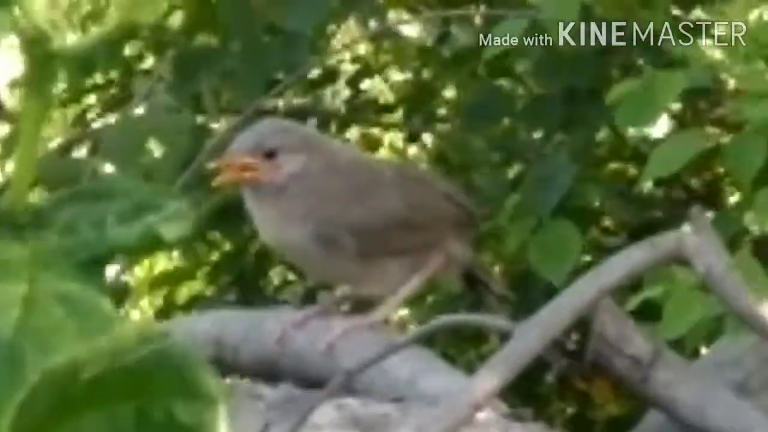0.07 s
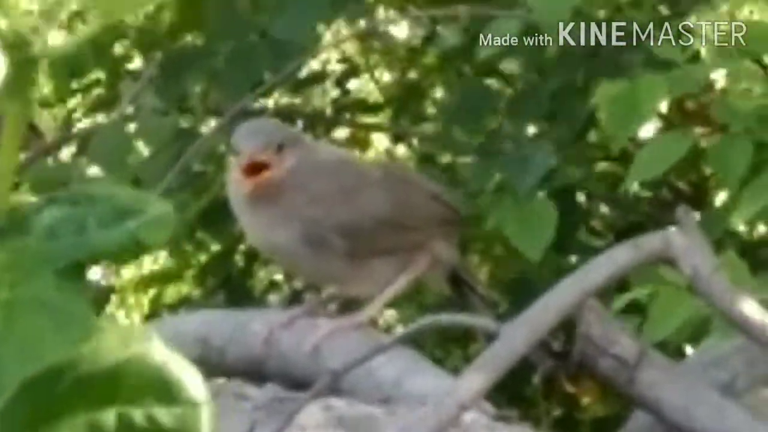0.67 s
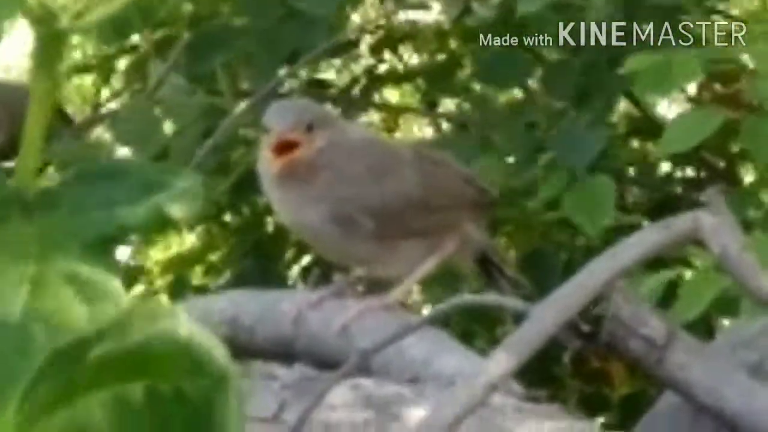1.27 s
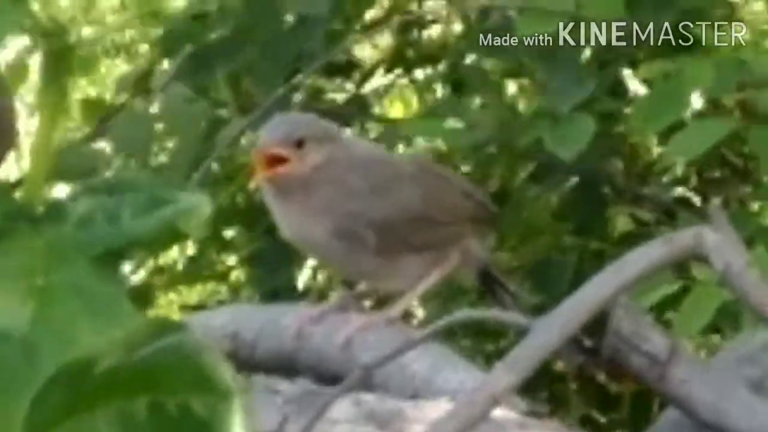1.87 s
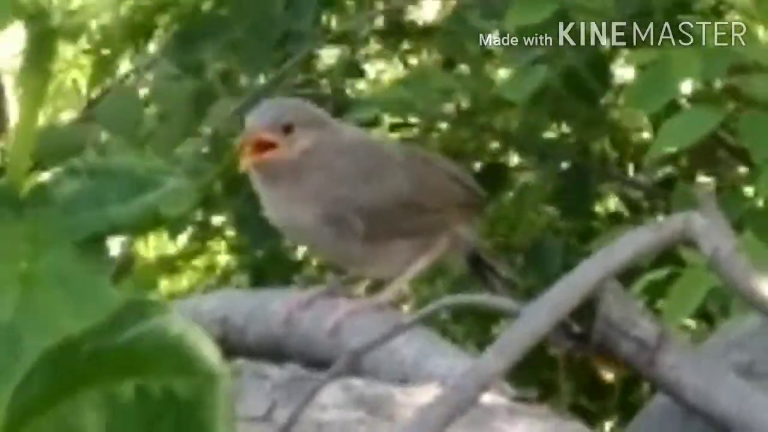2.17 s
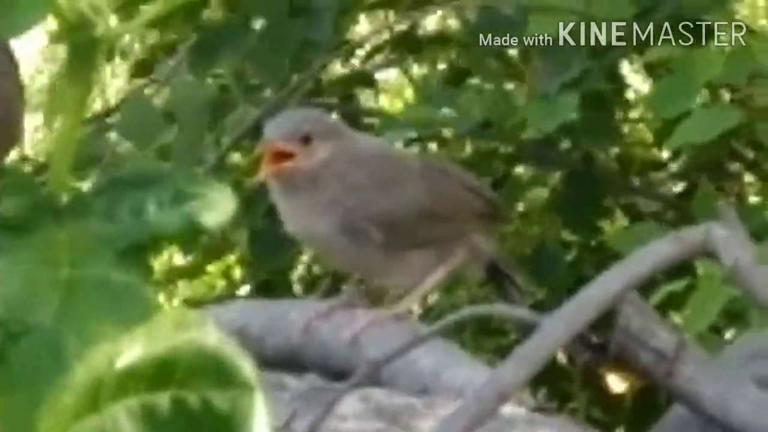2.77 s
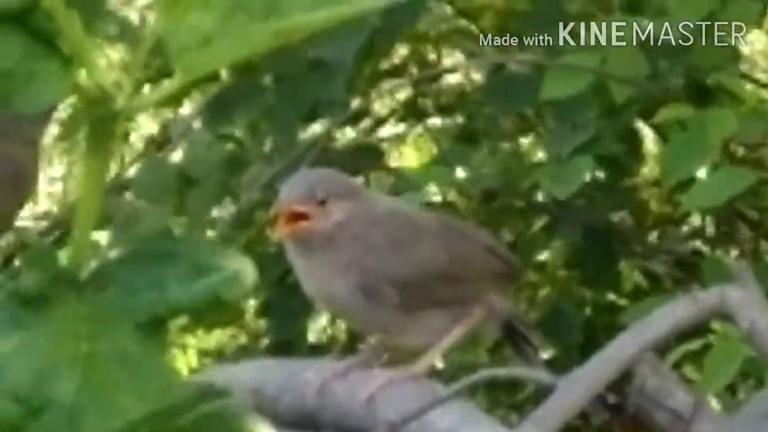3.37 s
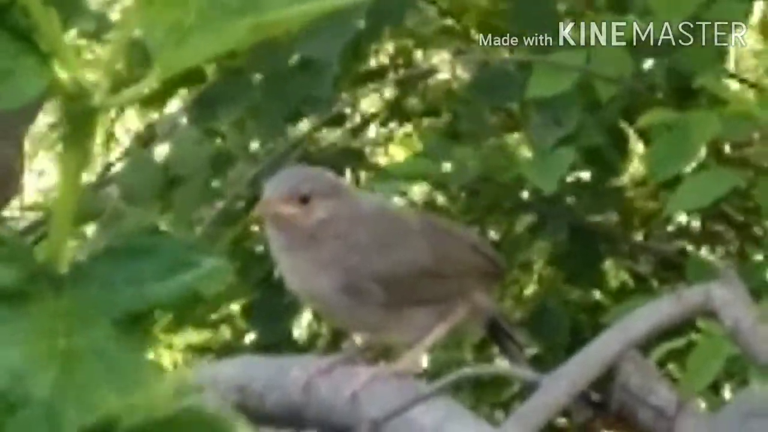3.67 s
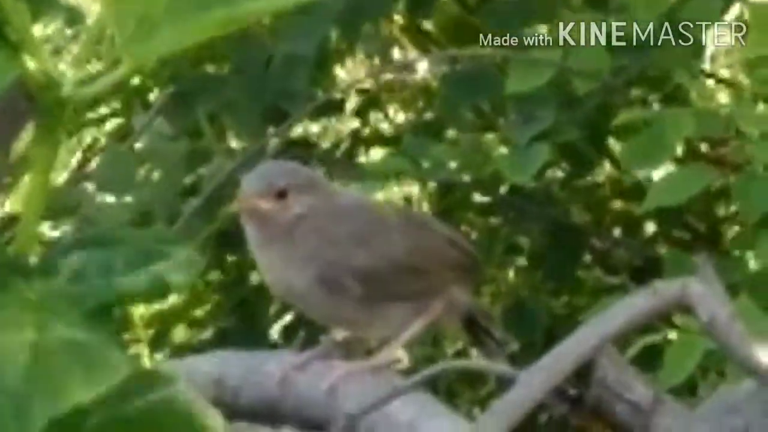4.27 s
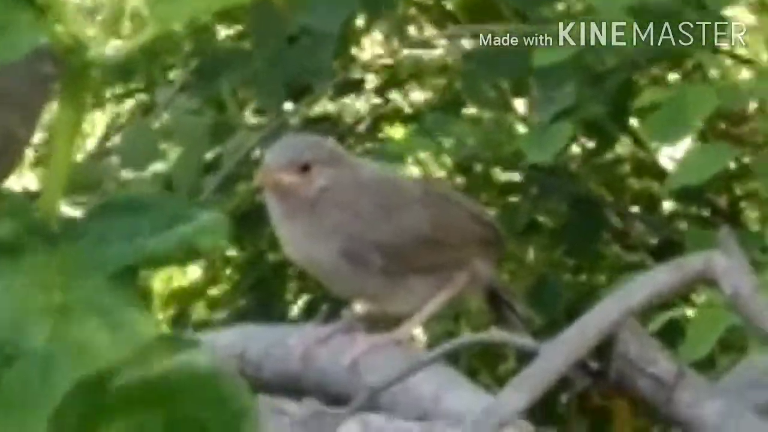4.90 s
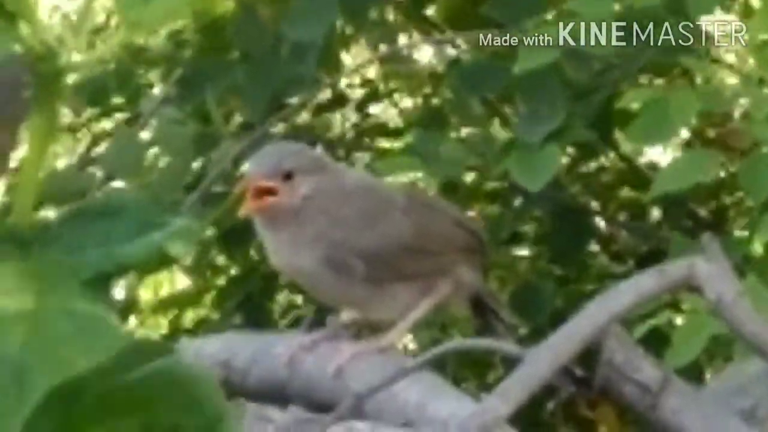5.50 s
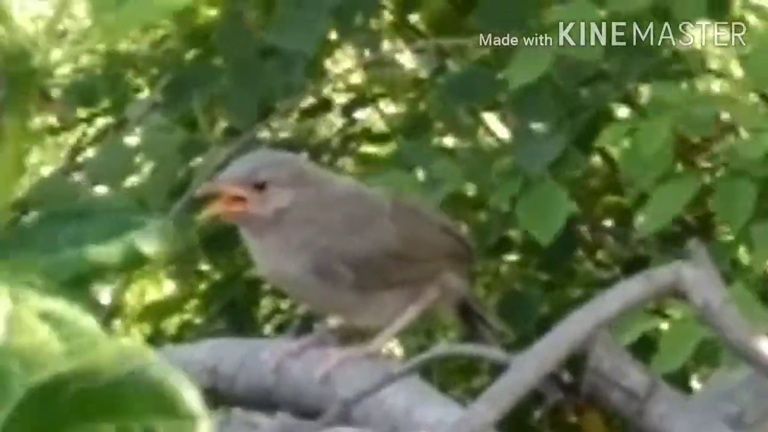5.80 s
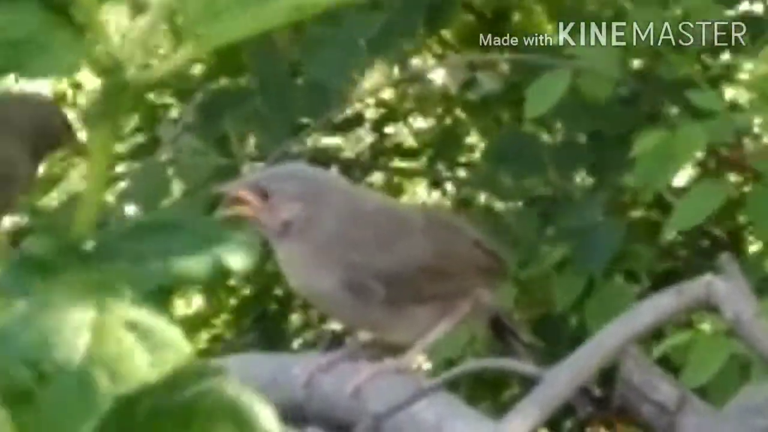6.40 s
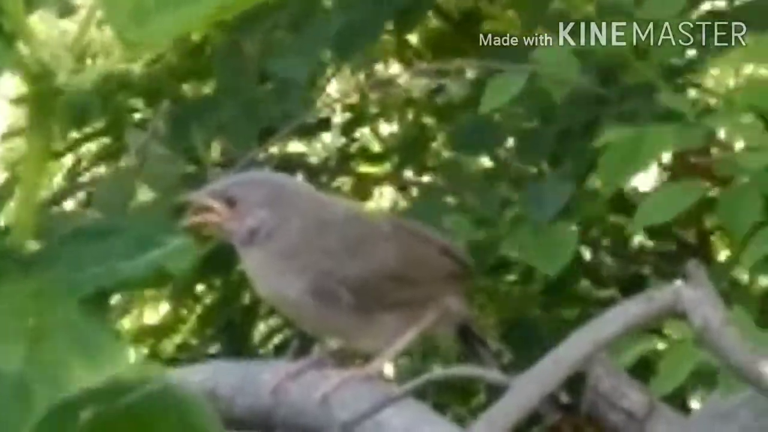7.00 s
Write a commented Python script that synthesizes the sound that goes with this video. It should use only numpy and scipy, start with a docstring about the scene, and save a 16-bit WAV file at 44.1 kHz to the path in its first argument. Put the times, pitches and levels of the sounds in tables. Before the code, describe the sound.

In a leafy thicket, a thin insect buzz and a distant bird's repeated stutter sit under a soft wash of air. Close to the microphone, a fledgling gives one nasal, scratchy call, and after a gap a hurried series of squawks and dry rasps. A muffled reply comes from farther off. Then uneven gusts thump and rumble on the microphone, shifting between left and right, with a faint rising whistle behind them.

```python
"""A young babbler begs from a branch close by: each call climbs from a rasp into a clear nasal arch
and collapses into a rasp again as its syrinx tightens and slackens. Farther off a second babbler
answers, one bird repeats a low stuttering phrase and another whistles upwards, all echoed by the
thicket. Insects shrill in the leaves, and late on the wind buffets the two microphone ports."""
import sys
import numpy as np
from scipy import signal
from scipy.fft import rfft, irfft, next_fast_len
from scipy.io import wavfile
from scipy.ndimage import uniform_filter1d, map_coordinates

SR = 44100
rng = np.random.default_rng(int(sys.argv[2]) if len(sys.argv) > 2 else 0)


def file_out(sig):
    """Save sig as 16-bit WAV at sys.argv[1]."""
    # one column per channel
    cols = np.atleast_2d(sig).T
    # limit, then scale
    lim = np.clip(cols, -1, 1)
    pcm = np.round(lim * 32767).astype(np.int16)
    wavfile.write(sys.argv[1], SR, pcm)


N = 319725

TOP_HZ = 15600  # band limit
SLACK_HZ, TAUT_HZ = 480, 2154.3  # pitch of a slack syrinx and of a typically taut one
# A muffled babbler's tone colour. Each row: frequency in Hz, relative level in dB.
MUFFLED_THROAT = [(700, -22), (1400, -20.5), (2150, 8), (2600, -0.5), (3200, -17.5), (4300, -11.5),
                  (6500, -11.5), (12000, -41)]


def amp(db):
    """Decibels to gain."""
    return 10 ** (np.asarray(db) / 20)


def unit(x):
    """Scaled to rms 1."""
    return x / np.sqrt(np.mean(x ** 2) + 1e-20)


def along(points, hz):
    """Read a curve of (Hz, value) points on a log frequency axis."""
    point_hz, values = np.transpose(points)
    return np.interp(np.log(hz + 1), np.log(point_hz + 1), values)


def curves(rows):
    """One value per sample for each column after the time."""
    s, *columns = np.transpose(rows)
    return [np.interp(np.arange(N) / SR, s, column) for column in columns]


def wobble(rate):
    """A smooth random curve, rate knots a second."""
    knots = rng.standard_normal(int(N * rate / SR) + 4)
    grid = np.linspace(0, len(knots) - 1, 10 * len(knots))
    return np.interp(np.arange(N) * (rate / SR), grid, map_coordinates(knots, [grid]))


def filtered(x, response):
    """x through a complex frequency response."""
    size = next_fast_len(N + 8192)
    return irfft(rfft(x, size) * response(np.fft.rfftfreq(size, 1 / SR)), size)[..., :N]


def coloured(x, spectrum):
    """x through a (Hz, dB) spectrum."""
    return filtered(x, lambda hz: amp(along(spectrum, hz)))


def noise(spectrum, channels=2):
    """Unrelated coloured noises of rms 1."""
    return unit(coloured(rng.standard_normal((channels, N)), spectrum))


def add(track, s, sound):
    """Mix a short sound into the track at time s."""
    start = max(round(s * SR), 0)
    part = track[..., start:start + sound.shape[-1]]
    part += sound[..., :part.shape[-1]]


def swells(rows):
    """A gain curve of smooth swells, each centred on its time."""
    gain = np.zeros(N)
    for s, length, db in rows:
        add(gain, s - length / 2, amp(db) * np.hanning(int(length * SR)))
    return gain


def control_times():
    """Times in seconds, a millisecond apart, for gestures and gusts."""
    return np.arange(0, N / SR, .001)


def near_babbler():
    """The begging bird, a little to the right: arched calls, harsh chaks, spits of hiss and a creak."""
    # Arched calls. Each row: time of the top, rise, hold and slackening time constant in seconds,
    # top pitch in Hz, flatness of the rise, sag from 0 to 1, seconds voiced before and after the top,
    # relative clear and rasp levels in dB, grit exponent.
    arches = [(.105, 0.073596, 0.035282, 0.02234, 2110, 6.7806, 0.13, 0.041595, 0.06606, -26.5, -30, 2.3094),
              (2.367, 0.07022, 0.010294, 0.06969, 2077, 1.4741, .03, 0.05919, 0.10815, -25.5, -31, 5.639),
              (2.651, 0.05453, 0.04125, 0.020466, 2186, 6.1837, 0.06, 0.03574, 0.06499, -27, -32.5, 1.787),
              (3.008, .073, .065, .023, 2430, 5.2, .18, .038, .094, -23, -27, 1.05),
              (3.246, .052, 0.042406, 0.020873, 1915, 8.8445, .11, .024, 0.07601, -32.5, -28.5, 2.3),
              (3.446, .075, .062, .021, 2286, 9.4, .16, 0.03785, .088, -22, -28.5, 1.6037),
              (3.624, .046, .045, .017, 1890, 9.7, .15, .023, .068, -32, -32, 3.1),
              (3.748, .056, .011, 0.039695, 1791, 2.1, .05, .05, 0.046664, -26, -29.5, 6.5)]
    # The other side of the syrinx joins in once. Each row: as for the arches.
    second_side_arches = [(3.647, .06, .024, .02, 2327, 3.5, .05, 0.0298, 0.02541, -36, -37, 1.546)]
    # Each row: start in seconds, starting pitch in Hz, hold in seconds, relative level in dB.
    chaks = [(0.241, 854.9, 0.01621, -39), (3.16, 1575, 0.048263, -29.5), (3.867, 1217, 0.03, -31),
             (3.98, 966, 0.0098, -31.5)]
    # Hiss where the voice cracks. Each row: middle and length in seconds, relative level in dB.
    cracks = [(.153, 0.0711, -36), (2.335, 0.0976, -38.5), (2.703, 0.03519, -36), (3.076, 0.0921, -28.5),
              (3.182, 0.05931, -34), (3.305, 0.04996, -46), (3.515, 0.06936, -31.5), (3.617, 0.04994, -38),
              (3.755, 0.1267, -33.5), (3.884, .06, -41.5)]
    # Colours of the open throat and of the hiss. Each row: frequency in Hz, relative level in dB.
    throat = [(450, -15), (900, -13), (1500, -8.5), (2300, -4), (3100, -13), (3650, -20), (4350, 1.5),
              (5450, -2.5), (6350, -5), (6900, -7.5), (7800, -17.5), (9500, -8), (10600, -6), (13000, -5),
              (15500, -16.5)]
    spit_colour = [(3000, -39.5), (4700, -5), (6200, -6), (8100, -11.5), (9400, 2.5), (10900, -9.5),
                   (12600, 3), (14000, -3.5), (15500, -15.5)]
    notes = [arch(*row) for row in arches] + [chak(*row) for row in chaks]
    voice = syrinx(phrase(notes), throat, flutter_db=1.7, clear_db=-4.5)
    second_notes = [arch(*row) for row in second_side_arches]
    second_side = syrinx(phrase(second_notes), MUFFLED_THROAT, flutter_db=9, clear_db=-7)
    hiss = beak_sway(noise(spit_colour, channels=1)[0])
    spits = swells(cracks) * hiss * amp(2.804 * wobble(450) - 1.0)
    bird = voice + second_side + spits + creak()
    heard = in_thicket(bird, lag_ms=.228, echo_db=-20, leaves_db=-6, leaves_t60=.024)
    return amp(-1.5) * head_turning(heard)


def arch(s, rise, hold, slacken, top_hz, flatness, sag, before, after, clear_db, rasp_db, grit):
    """The syrinx tightens, holds and breaks into a downsweep; tension sets pitch, level and rasp."""
    break_s = .003  # how gradually the held note tips into its fall
    t = control_times() - s
    tightening = 1 / (1 + (np.maximum(-t, 0) / rise) ** flatness)
    slackening = np.exp(-break_s * np.logaddexp(0, (t - hold) / break_s) / slacken)
    tension = tightening * slackening * np.exp(-abs(sag) * np.abs(t / rise) ** 1.25)
    pitch = SLACK_HZ + (top_hz - SLACK_HZ) * tension
    purity = tension ** abs(grit)  # a gritty call rings clear only at its very top
    level_db = rasp_db + (clear_db - rasp_db) * purity ** 2.555
    return note(pitch, purity, level_db, s - before, s + after, attack_db_per_s=480)


def chak(s, start_hz, hold, level_db, slacken_s=.05):
    """A sudden rasp from a syrinx that is already slackening."""
    above_hz = (start_hz - SLACK_HZ) * np.exp(-np.maximum(control_times() - s, 0) / slacken_s)
    tension = above_hz / (TAUT_HZ - SLACK_HZ)
    return note(SLACK_HZ + above_hz, tension, level_db, s, s + hold, attack_db_per_s=1999.5)


def note(pitch, tension, level_db, start, end, attack_db_per_s, release_db_per_s=616.5):
    """The voice swells in, holds from start to end and lets go: rows of time, pitch, dB, roughness."""
    # A slack syrinx rasps, a taut one rings clear. Each row: tension, roughness, both from 0 to 1.
    roughness_by_tension = [(0, 1), (.3, .8), (.68, .52), (.91, .04), (1, 0)]
    t = control_times()
    fade_db = attack_db_per_s * np.maximum(start - t, 0) + release_db_per_s * np.maximum(t - end, 0)
    roughness = np.interp(tension, *np.transpose(roughness_by_tension))
    return np.column_stack([t, pitch, np.maximum(level_db - fade_db, -120), roughness])


def phrase(notes):
    """One voice sings all the notes: at each moment the strongest has the syrinx."""
    notes = np.array(notes)
    strongest = np.argmax(notes[..., 2], axis=0)
    return notes[strongest, np.arange(notes.shape[1])]


def syrinx(gesture, throat, flutter_db, clear_db, harmonics=16):
    """A harmonic voice through a fixed throat; as it slackens, cycles go irregular and hiss pulses in."""
    # Colour from call to call. Each row: time in seconds, fundamental and high overtone gains in dB.
    voicing = [(.2, -0.5, 0), (2.3, -2.5, -7), (2.7, -3, -1.5), (2.97, -5, -2.5), (3.25, 0.5, -7),
               (3.45, 1, 2), (3.62, 0, -8), (3.75, -3.5, -3.5), (4.3, -3, -12)]
    # A rasp is brighter than the clear voice. Each row: frequency in Hz, gain in dB.
    rasp_tilt = [(700, -3), (1600, 1), (2800, 1.5), (4000, 1), (4650, 2), (5600, -0.5), (7000, 4),
                 (8200, -1), (9400, 4), (10900, -2.5), (12600, 4), (14500, 0)]
    pitch, level_db, rough = curves(gesture)
    rough = np.clip(rough, 0, 1)
    breath = amp(level_db) * np.clip((level_db + 64.5) / 6, 0, 1)  # too soft a breath stays silent
    on = breath > 0
    jitter = (.006 + .055 * rough) * wobble(1300) + (.003 + .014 * rough) * wobble(130)
    pitch = pitch * (1 + jitter)
    phase = 2 * np.pi * np.cumsum(pitch) / SR
    order = np.arange(1, harmonics + 1)[:, None]
    hz = order * pitch[on]
    # a clear, softly blown note has a smoother pulse, so its high overtones are weaker
    edge_db = (clear_db + 1.5 * np.clip(level_db[on] + 24, -12, 1.5)) * (1 - rough[on])
    pulse_db = edge_db * np.clip((order - 2) / 2.3936, 0, 1.25)
    fundamental_db, overtones_db = curves(voicing)
    voicing_db = (order == 1) * fundamental_db[on] + np.clip(hz / 3000 - 1.7, 0, 1) * overtones_db[on]
    gains = amp(along(throat, hz) + pulse_db + voicing_db) * (hz < TOP_HZ)
    tone = np.zeros(N)
    tone[on] = np.sum(gains * np.sin(order * phase[on]), axis=0) / np.sqrt(np.sum(gains ** 2, axis=0) / 2)
    bursts = rng.standard_normal(N) * (1 + np.cos(phase)) ** 2  # one burst of air per cycle
    low_cut_throat = [(100, -55.5)] + list(throat)
    hiss = filtered(bursts, lambda f: amp(along(low_cut_throat, f) + along(rasp_tilt, f)))
    hiss = beak_sway(unit(hiss))
    hiss_share = .0004 + .44 * rough ** 1.5
    flutter = amp(flutter_db * rough * wobble(330) + 1.3 * wobble(85))
    return breath * flutter * (np.sqrt(1 - hiss_share) * tone + np.sqrt(hiss_share) * hiss)


def creak(scatter_cycles=.055):
    """Between two calls the nearly slack syrinx grates in uneven clicks through a half-closed throat."""
    # Each row: time in seconds, pitch in Hz, relative level in dB.
    gesture = [(2.73, 712, -46.5), (2.765, 650, -39), (2.85, 545.8, -39.5), (2.912, 928.4, -43),
               (2.95, 720.8, -40.5)]
    # Each row: frequency in Hz, relative level in dB.
    half_closed_throat = [(300, -34.5), (600, -6), (1400, -2.5), (1900, 5), (2900, -12), (4500, -2),
                          (8000, -11.5), (12700, -6), (15500, -19)]
    s, pitch, level_db = np.transpose(gesture)
    t = np.arange(N) / SR
    click_hz = np.interp(t, s, pitch) * (1 + .025 * wobble(110))
    cycles = np.cumsum(click_hz) / SR + scatter_cycles * wobble(420)
    clicks = np.diff(np.floor(cycles), prepend=0) * amp(4.5 * wobble(220))
    grating = unit(coloured(clicks, half_closed_throat))
    breath = amp(-9) * noise(half_closed_throat, channels=1)[0]
    return amp(np.interp(t, s, level_db, left=-120, right=-120)) * unit(grating + breath)


def beak_sway(x, share=.022, rate=25):
    """The beak opens and closes a little, so the resonances of a hiss slide by a share of their pitch."""
    return map_coordinates(x, [np.arange(N) + share * SR / rate * wobble(rate)])


def head_turning(x, swing_db=2.5, rate=5):
    """The beak beams the treble; as the head turns, it favours one port and then the other."""
    treble = signal.sosfiltfilt(signal.butter(3, 7000, "high", fs=SR, output="sos"), x)
    turn = wobble(rate) * np.array([[.5], [-.5]])
    gains = amp(swing_db * turn)
    beamed = np.array([map_coordinates(port, [np.arange(N) + lead]) for port, lead in zip(treble, turn)])
    return x - treble + beamed * gains / np.sqrt(np.mean(gains ** 2, axis=0))


def far_babblers():
    """Others of the flock, dulled by the foliage: one answer and a few hoarse calls."""
    # The answering bird. Each row: as for the near babbler's arches and chaks.
    arches = [(4.412, .072, .032, .02, 2182, 7.3, .25, 0.01697, .056, -44.5, -48, 1.7918)]
    chaks = [(4.542, 760, 0.013795, -51)]
    # Hoarse calls deep in the thicket. Each row: middle and length in seconds, relative level in dB.
    rasps = [(0.445, 0.3707, -61.5), (1.648, 0.207, -62), (6.84, 0.2097, -64.5)]
    # Each row: frequency in Hz, relative level in dB.
    rasp_colour = [(1100, -32), (1600, -2.0), (2050, 3.0), (2800, -2.5), (5000, -23)]
    notes = [arch(*row) for row in arches] + [chak(*row) for row in chaks]
    voice = syrinx(phrase(notes), MUFFLED_THROAT, flutter_db=1.0, clear_db=-6)
    hoarse = swells(rasps) * noise(rasp_colour, channels=1)[0]
    return amp(4.5) * in_thicket(voice + hoarse, lag_ms=.04, echo_db=-8, leaves_t60=.03, depth=1.3)


def stutterer():
    """A distant bird repeats a soft lead note and a run of five falling ones."""
    # Each row: start of the run in seconds, relative level in dB.
    phrases = [(0.504, -48.5), (1.374, -52), (2.243, -48.5), (3.108, -50.5), (3.975, -52), (4.832, -52.5),
               (5.688, -56), (6.562, -57.5)]
    # One phrase. Each row: offset and length in seconds, start and end pitch in Hz, accent in dB.
    notes = [(-.14, 0.0421, 891.8, 805.1, -6), (0.002, 0.03041, 1063, 898, 1.5),
             (0.033, 0.028626, 1059, 895.8, 2), (0.075, 0.02507, 994.8, 902.7, 1),
             (.12, .026, 1030, 910, 1.5), (0.143, 0.05464, 971.1, 942.7, -1)]
    song = np.zeros(N)
    for s, db in phrases:
        for offset, length, start_hz, end_hz, accent_db in notes:
            gain = amp(db + accent_db + rng.normal(0, 1))
            add(song, s + offset, gain * glide(length, start_hz, end_hz))
    return amp(-3) * in_thicket(song, lag_ms=0.1153, echo_db=-7.5)


def whistlers():
    """Small birds: a rising whistle that breaks into a warble, and one thin chip."""
    # Each row: start and length in seconds, start and end pitch in Hz, relative level in dB,
    # warble depth in Hz.
    whistles = [(5.61, .098, 2340, 2720, -45, 0), (5.693, 0.10193, 3253, 3480, -45, 103),
                (5.787, .028, 3882, 4600, -51.5, 120), (5.797, 0.06934, 5107, 5380, -47, 119.5),
                (6.828, 0.02887, 7500, 7780, -46, 150)]
    song = np.zeros(N)
    for s, length, start_hz, end_hz, db, warble_hz in whistles:
        add(song, s, amp(db) * glide(length, start_hz, end_hz, warble_hz, softness=1.595))
    return amp(-3.5) * in_thicket(song, lag_ms=.03, echo_db=-6, depth=2.1)


def glide(length, start_hz, end_hz, warble_hz=0, warble_rate=78, softness=0.4866):
    """One pure gliding note that swells and fades."""
    t = np.arange(int(length * SR)) / SR
    hz = start_hz + (end_hz - start_hz) * t / length + warble_hz * np.sin(2 * np.pi * warble_rate * t)
    envelope = np.abs(np.sin(np.pi * t / length)) ** softness
    return np.sqrt(2) * envelope * np.sin(2 * np.pi * np.cumsum(hz) / SR)


def wind():
    """Eddies hit each port on their own; a sustained hard gust makes smaller, brighter eddies."""
    # Colours of the low buffeting and the small eddies. Each row: frequency in Hz, relative level in dB.
    buffet_colour = [(25, -0.5), (70, -13), (110, -2.5), (150, 2), (220, -4), (330, -14), (500, -33.5),
                     (900, -71.5), (2000, -90.5)]
    eddy_colour = [(150, -5), (280, 9.5), (420, 6.5), (600, -1.5), (850, -14.5), (1250, -39), (2500, -75.5)]
    # Hard puffs. Each row: middle in seconds, relative level in dB, left over right in dB, pitch in Hz.
    puffs = [(0.065, -23.5, 20, 137.1), (5.085, -19.5, 13, 159.7), (5.179, -18.5, 14.5, 138.2),
             (5.443, -18, -25, 222.4), (5.967, -17, -34, 410), (6.083, -19.5, 21, 244.4),
             (6.228, -12.5, 20, 400), (6.278, -10, 35, 400), (6.301, -12.5, 35, 210.5),
             (6.314, -12.5, 35, 301.3)]
    gust = gust_strength()
    force = gust * unit(amp(1.6205 * np.array([wobble(180), wobble(180)])))
    sustained = np.abs(uniform_filter1d(gust, size=3000, axis=1))
    brightness = np.clip(sustained / amp(-14.5), 0, 1.2) ** 2
    turbulence = (noise(buffet_colour) + brightness * noise(eddy_colour)) / np.sqrt(1 + brightness ** 2)
    air = amp(0.8685) * force * turbulence
    t = np.arange(-SR // 40, SR // 40) / SR
    for s, db, side_db, hz in puffs:
        puff = -np.cos(2 * np.pi * hz * t) / np.cosh(2.5 * hz * t)  # one dull push between soft rebounds
        pan = unit(amp([[side_db / 2], [-side_db / 2]]))
        add(air, s + t[0], amp(db) * pan * puff)
    pressure = .5 * np.tanh(air / .5)  # the hardest buffets are rounded off
    return signal.sosfilt(signal.butter(3, [98, 1300], "band", fs=SR, output="sos"), pressure)


def gust_strength(drop_db=19.5, rise_share=0.3324):
    """Wind pressure on the left and right port: quick swells that die away, over a slower breeze."""
    # Each row: crest in seconds, seconds to fall by drop_db, relative left and right levels in dB.
    gusts = [(0.033, 0.0946, -34, -38), (0.687, 0.0011, -37.5, -64.0), (4.966, 0.0135, -32.0, -64.0),
             (5.024, 0.1187, -45, -38), (5.097, 0.0321, -35.5, -25), (5.142, 0.0648, -26.0, -30.5),
             (5.185, 0.0688, -31, -23.5), (5.224, 0.0116, -31.5, -31.0), (5.249, 0.0369, -64.0, -29.0),
             (5.366, 0.035, -64.0, -27.5), (5.402, 0.2454, -47.0, -35.5), (5.573, 0.1088, -31.0, -52.5),
             (5.668, 0.0771, -35.0, -34.5), (5.761, 0.1312, -28, -31.5), (5.932, 0.1572, -31, -30.0),
             (5.999, 0.0466, -35.5, -24), (6.046, 0.289, -64.0, -27.5), (6.103, 0.038, -40.5, -16),
             (6.125, 0.0481, -18.5, -63.0), (6.21, 0.0578, -23.5, -30), (6.227, 0.0289, -15, -45),
             (6.277, 0.0791, -12, -30.5), (6.317, 0.2448, -16.5, -33.5), (6.423, 0.0339, -20, -64.0),
             (6.501, 0.0323, -23.5, -25.5), (6.574, 0.0433, -26.0, -35), (6.644, 0.0113, -23, -64.0),
             (6.708, 0.0173, -16.5, -64.0), (6.725, 0.0068, -18.5, -36.0), (6.794, 0.0225, -21.5, -32),
             (6.829, 0.2036, -21.5, -64.0), (6.87, 0.0303, -19.5, -64.0), (6.94, 0.0615, -16.5, -64.0),
             (7.072, 0.0574, -15, -64.0), (7.1, 0.5662, -22.5, -40)]
    # Each row: time in seconds, relative level in dB.
    breeze = [(0, -51.5), (.35, -57.5), (.7, -53.5), (.82, -69.5), (4.8, -68.5), (5.05, -51), (5.3, -62),
              (5.75, -53.5), (6.3, -45), (6.6, -46.5), (7.25, -45.5)]
    t = control_times()
    power = np.tile(amp(np.interp(t, *np.transpose(breeze))) ** 2, (2, 1))
    for s, fall_s, left_db, right_db in gusts:
        from_crest = np.maximum(t - s, (s - t) / rise_share) / fall_s
        power += amp(np.array([[left_db], [right_db]]) - drop_db * from_crest) ** 2
    return np.array([np.interp(np.arange(N) / SR, t, port) for port in np.sqrt(power)])


def insects():
    """Many shrill wings blur into one band; the nearest insect adds a faint pulsing, wavering line."""
    # The swell of the chorus. Each row: time in seconds, relative level in dB.
    chorus_levels = [(0, -55), (.9, -55), (1.25, -50), (1.6, -54.5), (2.2, -51.5), (4.3, -54.5), (5.4, -57),
                     (6.1, -55), (7.25, -55)]
    # Each row: frequency in Hz, relative level in dB.
    wing_colour = [(4150, -60), (4330, -11), (4480, -2.5), (4680, .5), (4950, 1), (5200, -2.5),
                   (5550, -2.5), (5970, -6), (6180, -22), (7000, -45)]
    level_db, = curves(chorus_levels)
    t = np.arange(N) / SR
    pulsing = 1 + .25 * np.sin(2 * np.pi * 84 * t + wobble(3.2))
    line_hz = 4955 + 35 * wobble(120)
    line = np.sin(2 * np.pi * np.cumsum(line_hz) / SR) * amp(1.309 * wobble(18))
    nearest = pulsing * (noise(wing_colour, channels=1)[0] + amp(-4) * line)
    chorus = amp(-2) * noise(wing_colour) + in_thicket(nearest, lag_ms=.37, echo_db=-10, leaves_db=-18)
    return amp(level_db + 0.4312) * chorus


def woodland():
    """A soft wash of leaves and far air, with the tick of a twig."""
    # Each row: start in seconds, relative level in dB.
    ticks = [(2.102, -25.5)]
    # Colours of the wash and of the twig. Each row: frequency in Hz, relative level in dB.
    air_colour = [(25, -12), (60, -11), (110, 1), (185, 8.5), (260, 4.5), (400, 2), (800, -1), (1400, -5),
                  (3500, -6.5), (6400, -3.5), (8100, 1), (10000, -1), (12500, -2.5), (14200, -8),
                  (15500, -13.5)]
    twig_colour = [(3000, -38), (7000, -7), (9000, 4.5), (11000, -4.5), (15000, -7.5)]
    tick_envelope, tick_t60 = np.zeros(N), 0.03243
    t = np.arange(SR // 20) / SR
    for s, db in ticks:
        add(tick_envelope, s, amp(db - 7.5 - 60 * t / tick_t60))
    wash = amp(-50 + 0.1467 * wobble(2.1574)) * noise(air_colour)
    return wash + tick_envelope * noise(twig_colour)


def in_thicket(x, lag_ms, echo_db, leaves_db=-9, leaves_t60=0.17, depth=1):
    """Sound reaches the left port late; leaves scatter its treble; the echo lengthens with depth."""
    # The thicket's echo. Each row: frequency in Hz, seconds to fall by 60 dB at depth 1.
    decay_times = [(500, 0.0793), (3000, 0.2114), (12000, 0.0948)]
    direct = filtered(x, lambda hz: np.exp(np.pi * 1j * hz * lag_ms / 1000 * np.array([[-1], [1]])))
    hz, t, bands = signal.stft(rng.standard_normal((2, SR // 2)), SR, nperseg=256)
    t60 = depth * along(decay_times, hz)[:, None]
    tail = signal.istft(bands * amp(-60 * t / t60), SR, nperseg=256)[1]
    leaves = np.diff(rng.standard_normal(tail.shape), prepend=0)
    leaves *= amp(-60 * np.arange(tail.shape[1]) / SR / leaves_t60)
    echo = amp(echo_db) * tail / np.linalg.norm(tail[0])
    scatter = amp(leaves_db) * leaves / np.linalg.norm(leaves[0])
    return direct + signal.fftconvolve(x[None], echo + scatter, axes=1)[:, :N]


def scene():
    """Birds, insects and wind among the trees."""
    return near_babbler() + far_babblers() + stutterer() + whistlers() + insects() + wind() + woodland()


def record(dry):
    """The two ports colour the treble differently, and nothing passes above the band limit."""
    # The left port is the brighter one. Each row: frequency in Hz, left over right in dB.
    port_balance = [(500, 0.5), (2200, 4), (3200, -2.5), (4700, 1.5), (6600, -5), (8200, 0.5), (10500, 4.5),
                    (12500, 11.5), (15000, 18.5)]
    # The lag between left and right varies with frequency.
    # Each row: frequency in Hz, extra lag of the left in radians.
    uneven_lag = [(1500, -0.1476), (2300, 1.6266), (3000, 0.323), (3800, -0.7922), (4500, 0.3818)]

    def response(hz):
        side = np.array([[.5], [-.5]])
        gains = amp(along(port_balance, hz) * side)
        lag = np.exp(-1j * along(uneven_lag, hz) * side)
        return lag * gains / np.sqrt(np.mean(gains ** 2, axis=0)) * (hz < TOP_HZ)
    return filtered(dry, response)


dry = scene()
out = record(dry)
file_out(out)
```